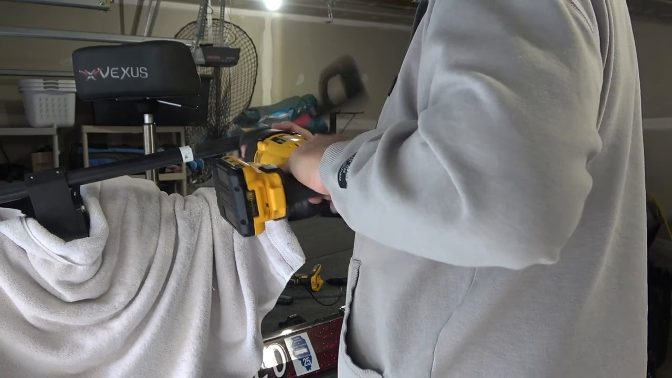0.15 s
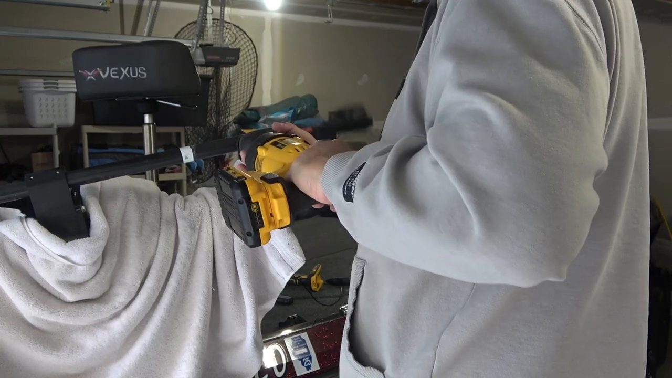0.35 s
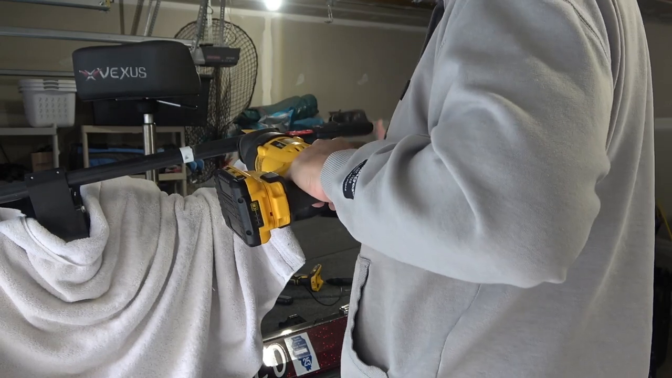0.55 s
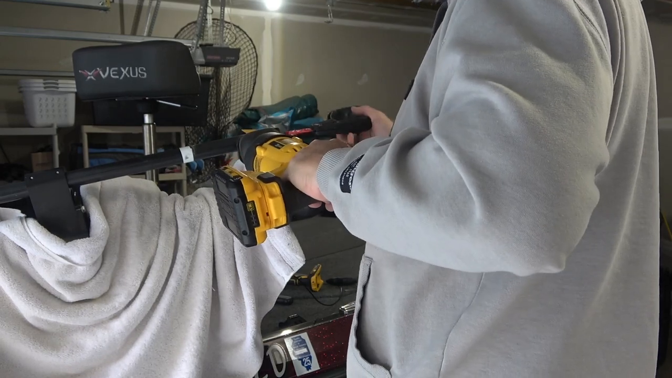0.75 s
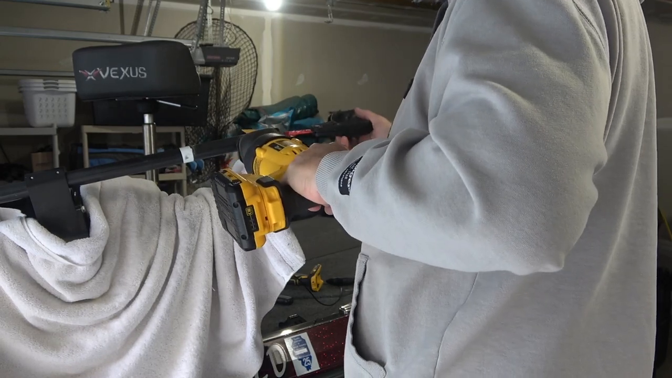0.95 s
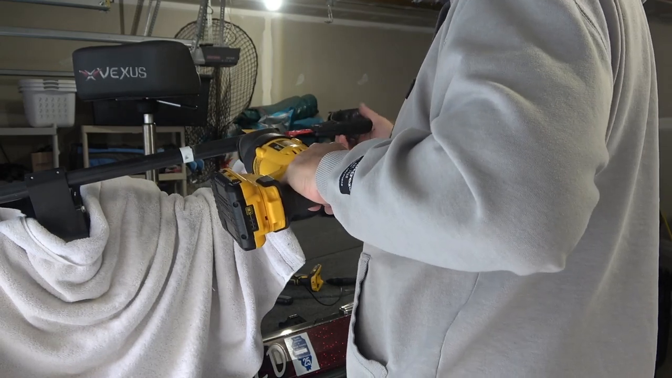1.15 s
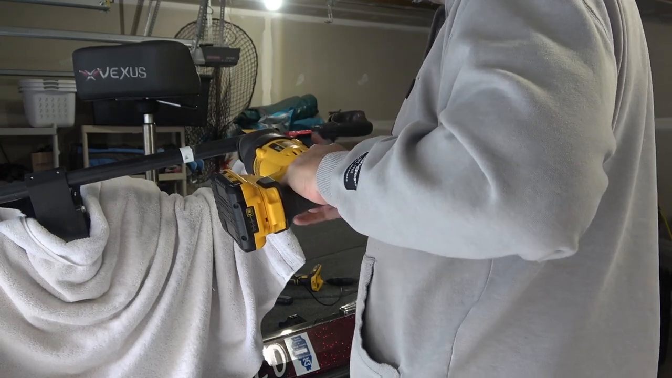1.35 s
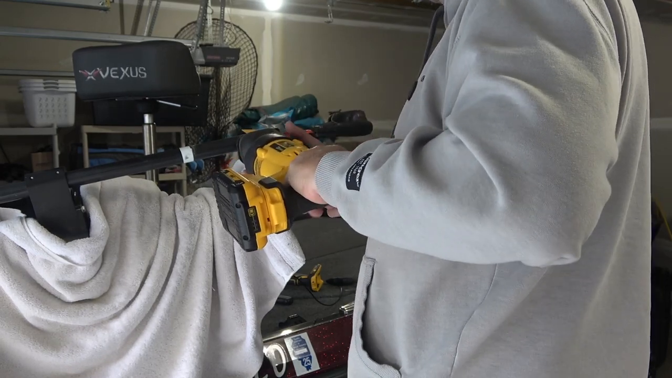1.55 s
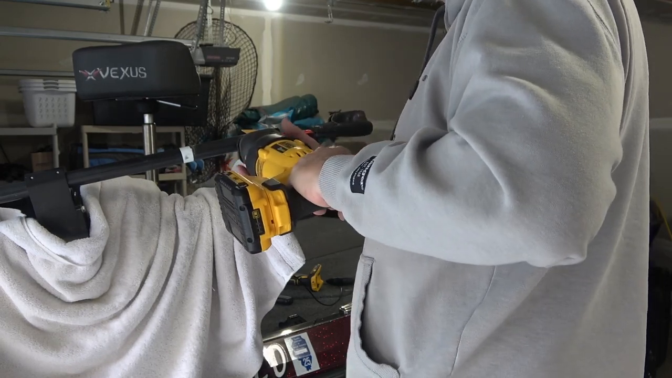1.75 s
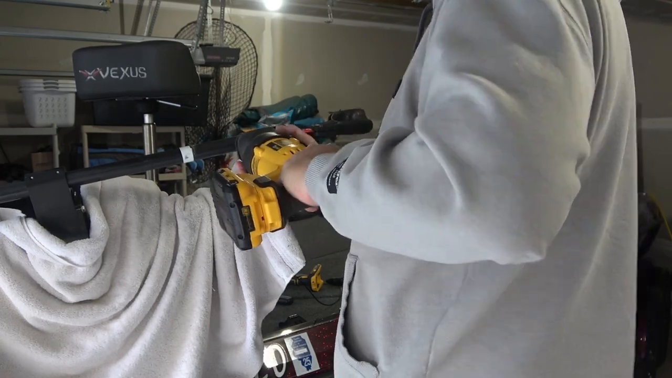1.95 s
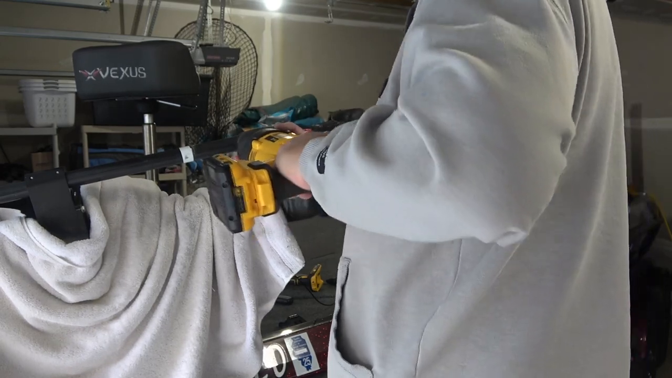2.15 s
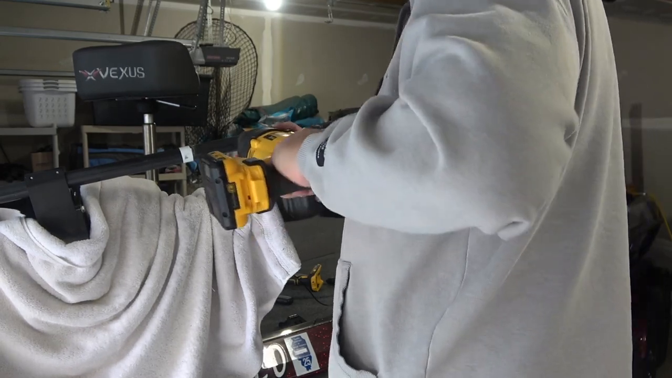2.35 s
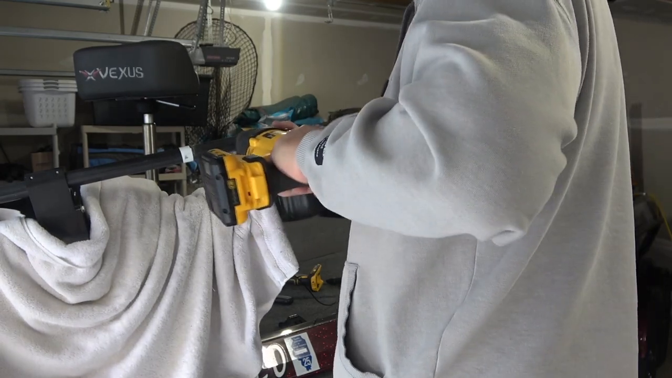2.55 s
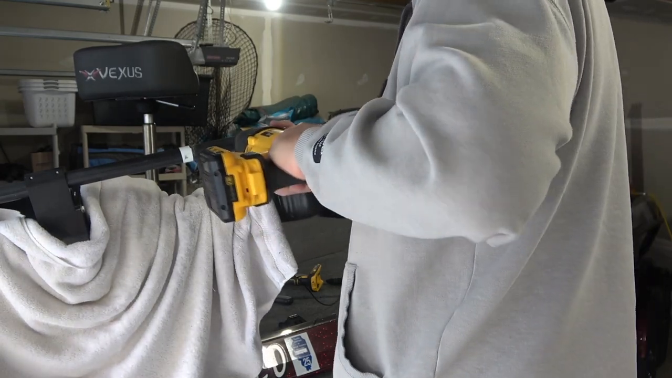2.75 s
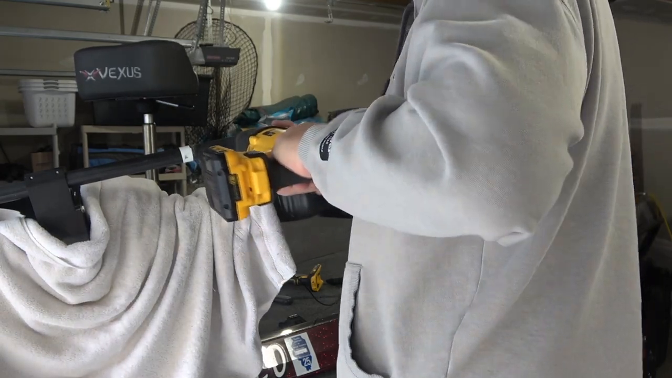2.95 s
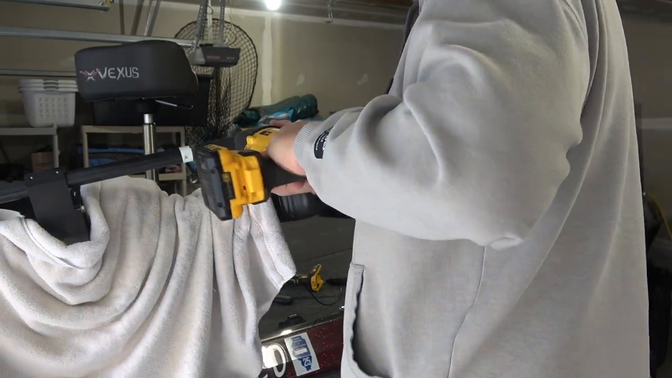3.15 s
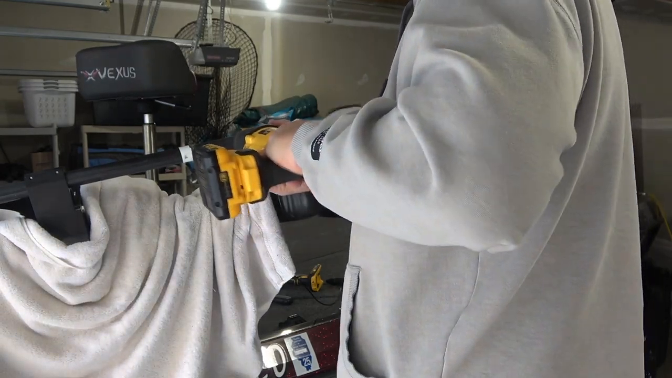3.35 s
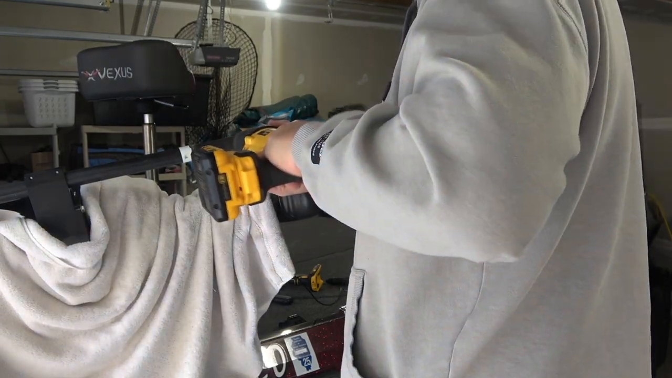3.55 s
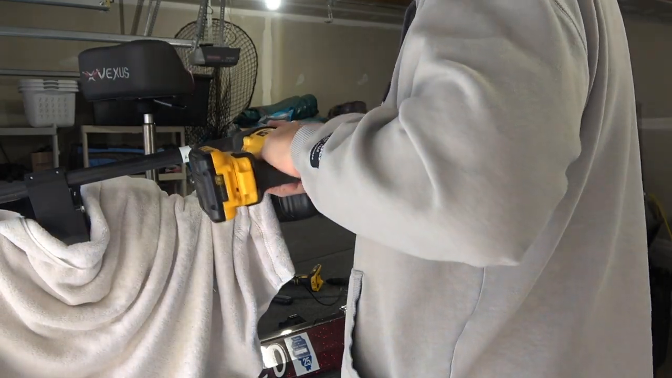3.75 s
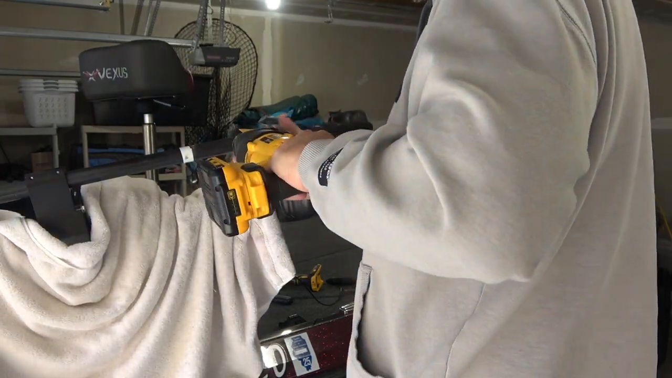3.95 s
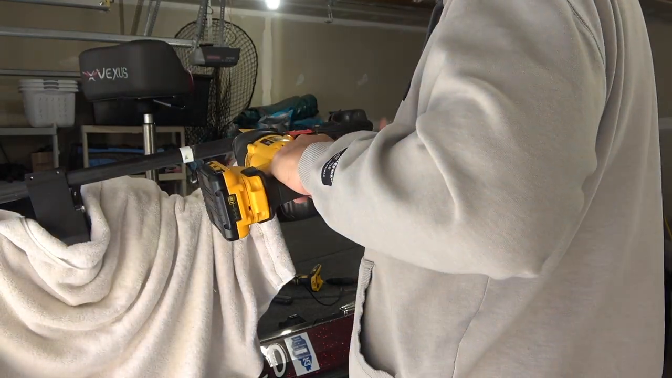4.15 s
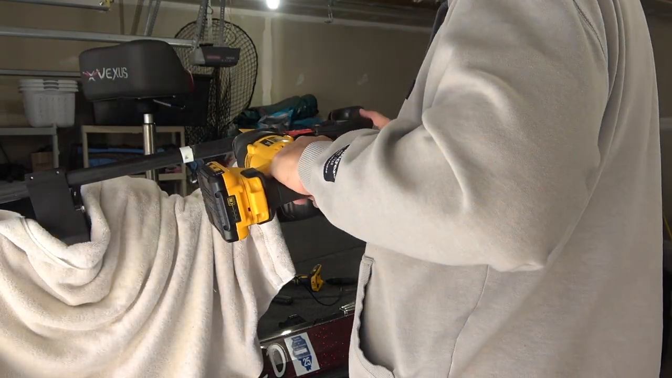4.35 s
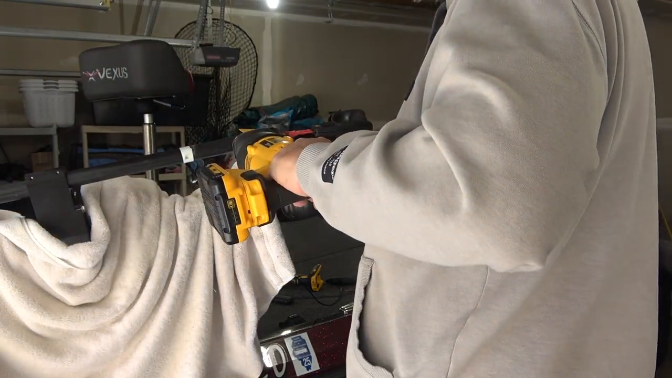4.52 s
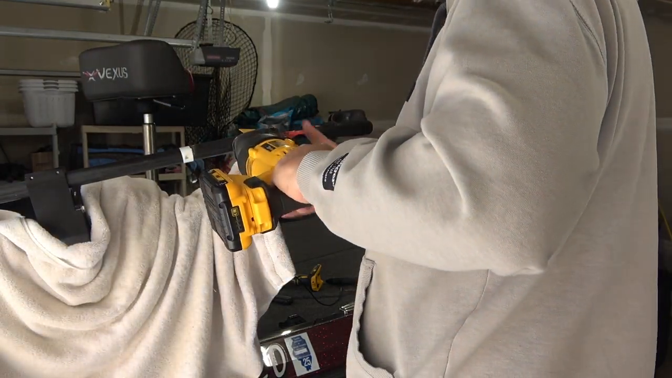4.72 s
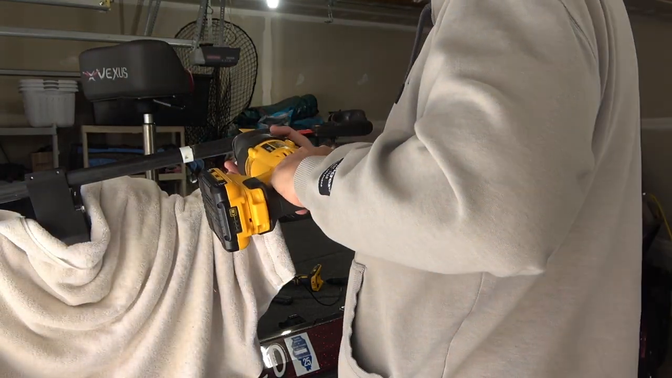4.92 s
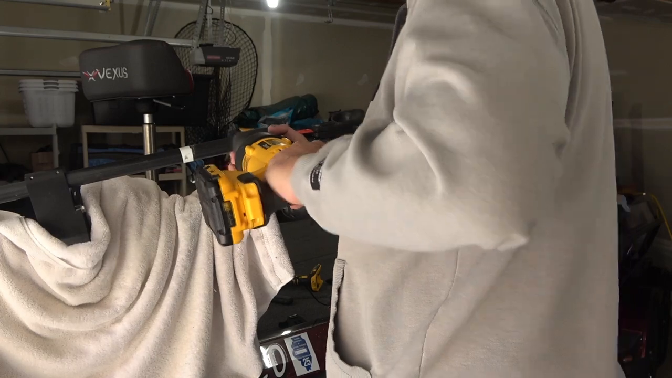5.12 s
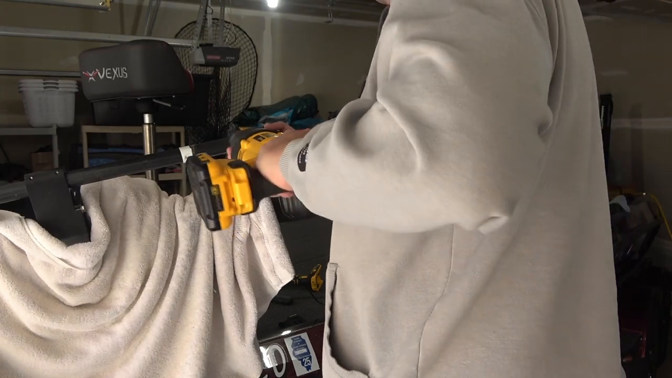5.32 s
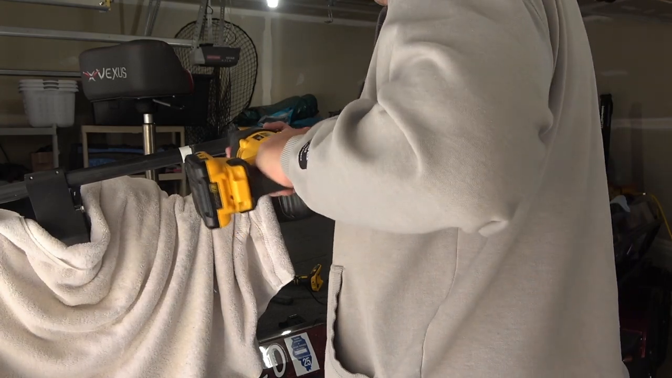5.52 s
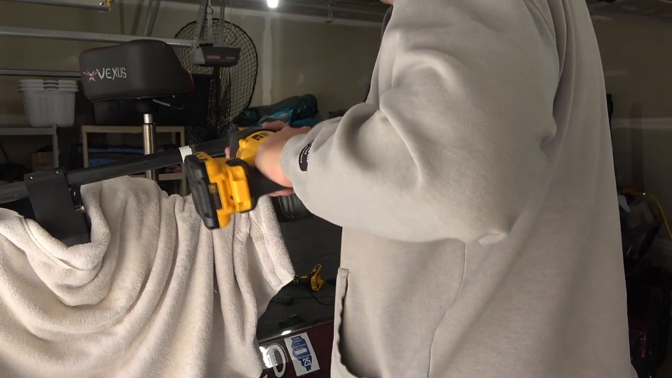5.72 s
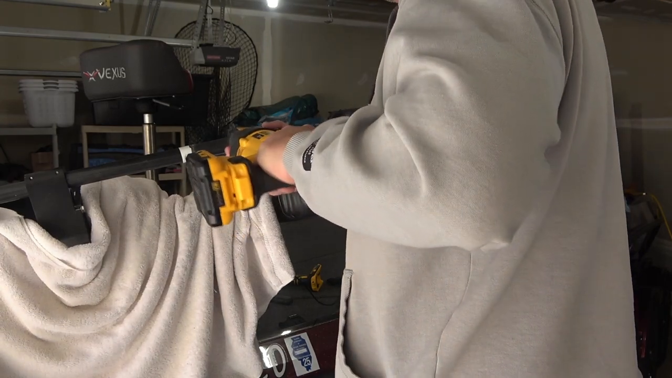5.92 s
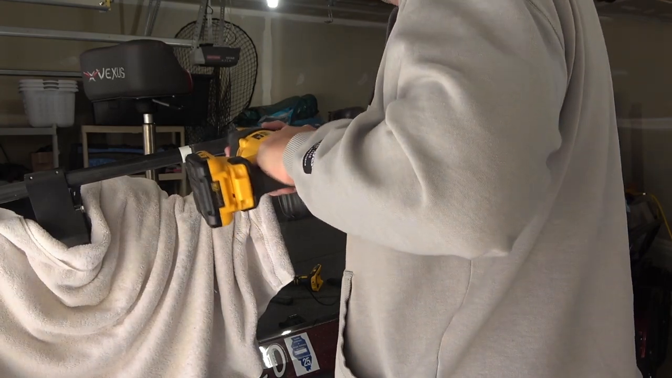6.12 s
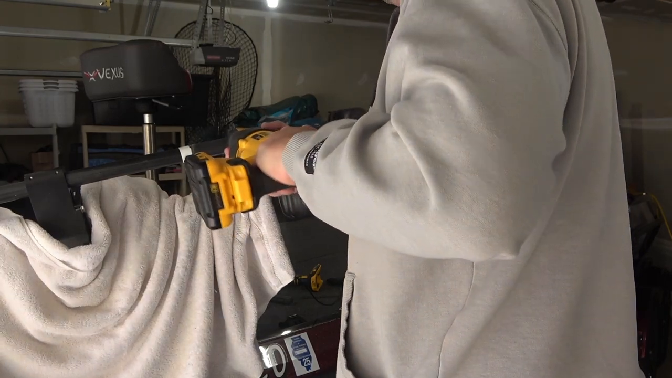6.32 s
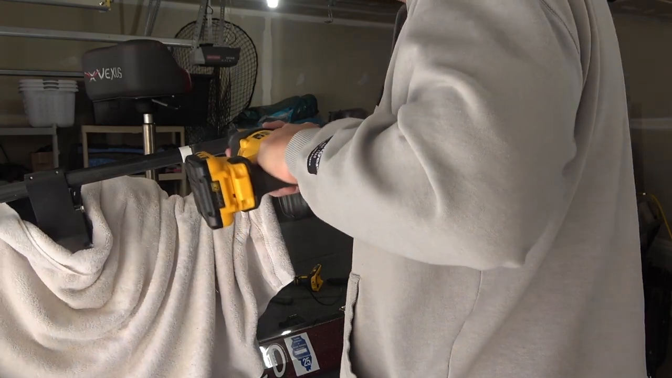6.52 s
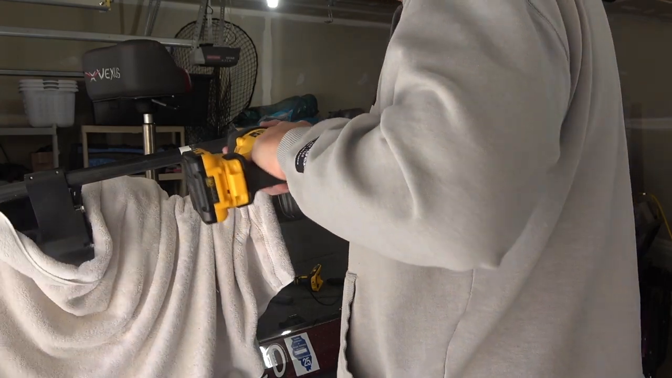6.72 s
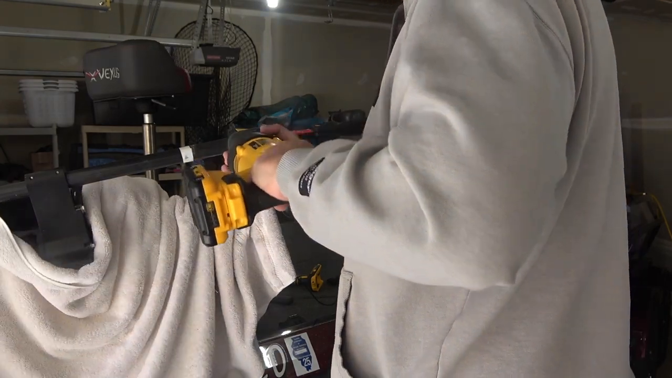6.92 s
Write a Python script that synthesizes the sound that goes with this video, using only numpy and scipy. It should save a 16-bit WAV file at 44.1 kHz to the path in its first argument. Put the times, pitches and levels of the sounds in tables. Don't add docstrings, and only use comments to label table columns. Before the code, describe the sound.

Close stereo microphone in a garage with a short, diffuse echo and faint low hum. At 0 s a saw is already tearing steel, a loud gritty rasp pulsing about 37 times a second, with a clank near 0.1; it brakes dead at 0.24. Small chips tick until about 0.9, cloth rubs near 0.45, and a soft knock, sleeve rustle and light drag on a tube come around 1.3-1.6. At 1.93, after a tiny electronic whine, the saw spins up fast, chattering brightly, then grinding with wavering hum and squeals; from 3.2 loose metal slaps, pings and sizzles until the abrupt stop at 3.85. Ticks follow, with wooden knocks at 4.14 and 4.58 and rustling cloth. At 5.06 the last cut bites, rough and clanging hardest around 5.5-5.8, then singing thinly with scattered slaps until it stops at 6.86, leaving two ticks and a fading echo.

```python
import sys
import numpy as np
from scipy import signal
from scipy.fft import rfft, irfft
from scipy.io import wavfile
from scipy.ndimage import uniform_filter1d

SR = 44100
rng = np.random.default_rng(int(sys.argv[2]) if len(sys.argv) > 2 else 0)


def amplitude_ratio(level_db):
    exponent = np.asarray(level_db, float) / 20
    return 10 ** exponent


def unload_wav(signal):
    wavfile.write(
        sys.argv[1],
        SR,
        np.round(np.clip(np.atleast_2d(signal).T, -1, 1) * 32767).astype(np.int16),
    )


N = 312228
TIME = np.arange(N) / SR


def level(x, db):
    return x * amplitude_ratio(db) / np.sqrt(np.mean(x ** 2))


def noise():
    return rng.standard_normal(N)


def colour(x, spectrum, size=4096):
    hz, db = np.transpose(spectrum)
    log_hz = np.log(np.fft.rfftfreq(size, 1 / SR) + 1)
    log_gain = np.interp(log_hz, np.log(hz), db) * np.log(10) / 20
    cepstrum = irfft(log_gain)
    cepstrum[1:size // 2] *= 2
    cepstrum[size // 2 + 1:] = 0
    return signal.fftconvolve(x, irfft(np.exp(rfft(cepstrum))))[:len(x)]


def band(x, lo_hz, hi_hz, order=2):
    sos = signal.butter(order, [lo_hz, min(hi_hz, SR / 2.1)], "bandpass", fs=SR, output="sos")
    return signal.sosfilt(sos, x)


def peak(x, hz, width):
    return signal.lfilter(*signal.iirpeak(hz, hz / width, fs=SR), x)


def peaks(x, modes):
    return sum(amplitude_ratio(db) * peak(x, hz, width) for hz, width, db in modes)


def ring(x, modes):
    return sum(amplitude_ratio(db) / np.sqrt(width) * peak(x, hz, width) for hz, width, db in modes)


def walk(rate):
    hold = int(SR / rate)
    steps = np.repeat(rng.standard_normal(N // hold + 1), hold)
    return 1.3 * uniform_filter1d(uniform_filter1d(steps, hold), hold)[:N]


def burst(times, db, decay_s, rough=0.69):
    kicks = np.zeros(N)
    kicks[np.clip((np.asarray(times) * SR).astype(int), 0, N - 1)] = amplitude_ratio(np.asarray(db))
    grain = noise()
    decay = signal.lfilter([1], [1, -np.exp(-1 / (decay_s * SR))], kicks)
    return (rough * grain + (1 - rough) * np.sign(grain)) * decay


def swells(rows, rest_db=-120):
    power = sum(amplitude_ratio(db) ** 2 * np.exp(-2 * ((TIME - s) / half) ** 2) for s, half, db in rows)
    return np.sqrt(amplitude_ratio(rest_db) ** 2 + power)


# time in seconds, strokes a second [Hz],
# feed pressure as scrape level in dB.
RUNS = [
    [(0.0, 36.6, -22.5), (0.19, 37.5, -24.5), (0.235, 38.4, -20.5)],
    [(1.926, 40.2, -18), (2.13, 41.0, -19), (2.34, 40.0, -20.5), (2.72, 38.7, -22), (2.842, 38.2, -22.5),
     (2.95, 38.9, -21.5), (3.24, 37.8, -23), (3.68, 37.7, -23), (3.85, 37, -24)],
    [(5.056, 41.1, -19.5), (5.31, 39.7, -21), (5.42, 38.4, -22), (5.63, 37.8, -25.5), (6.03, 37.7, -26.5),
     (6.176, 37.8, -25), (6.3, 37.9, -27.5), (6.66, 37.9, -24), (6.86, 37.9, -25.5)],
]
SPIN_UP_S = [.07, 0.12, 0.06]


def controls():
    s, rate, feed_db = np.vstack(RUNS).T
    press, release = np.array([(run[0][0], run[-1][0]) for run in RUNS]).T
    which = np.searchsorted(press, TIME, "right") - 1
    since = np.where(which > 0, TIME - press[which], np.inf)
    still_slow = np.clip(1 - since / np.take(SPIN_UP_S, which), 0, 1) ** 2.97
    coast = np.clip(1 - (release[which] - TIME) / 0.029, 0, 1)
    scrape_db = np.interp(np.minimum(TIME, release[which]), s, feed_db)
    scrape_db = scrape_db - 42 * still_slow - 12 * coast
    bright_db = -2 * np.exp(-since / 0.095) + 0.76 * walk(9.9)
    return np.interp(TIME, s, rate), scrape_db, bright_db


def running(brake_s=0.005):
    on = sum(1. * ((TIME >= run[0][0]) & (TIME < run[-1][0])) for run in RUNS)
    step = 1 / (brake_s * SR)
    return np.maximum(on, signal.lfilter([step], [1, step - 1], on))


def saw():
    rate, scrape_db, bright_db = controls()
    turn = 2 * np.pi * np.cumsum(rate) / SR
    on = running()
    bite = bites(turn, on)
    drive = colour(bite * noise(), SCRAPE)
    layers = cut(bite, drive, bright_db) + squeal(drive) + swarf(bite) + chatter(bite)
    layers = layers + rumble() + amplitude_ratio(-9.5) * on * crank(turn) + amplitude_ratio(4.5) * on * housing(turn)
    return amplitude_ratio(scrape_db) * layers


def bites(turn, on):
    stroke = 1 + 0.068 * np.cos(turn + 0.77 * walk(2.7))
    hard = np.repeat(rng.exponential(size=N // 16 + 1), 16)[:N]
    return stroke * amplitude_ratio(0.54 * walk(60) + 1.2 * hard) * on * hops()


# frequency in Hz, density in dB per Hz.
SCRAPE = [(20, -54.5), (100, -17), (190, -5.5), (330, -17.5), (480, -11.5), (650, -7), (1000, -7.5),
          (2500, 1), (3500, -6), (4700, -10.5), (6000, -14.5), (7300, -10), (9500, -22.5), (12000, -29.5),
          (13500, -32), (15600, -41.5)]
# frequency in Hz, width in Hz, level in dB over the scrape there.
SHAFT = [(690, 110, -1), (905, 90, 1), (1035, 60, 2), (3470, 140, 5), (3600, 120, 4), (4716, 160, 1),
         (5420, 80, 0), (5800, 90, 8)]
# frequency in Hz, width in Hz, level in dB over the scrape there.
BLADE = [(7720, 60, 2), (8335, 80, 4), (9960, 45, 5), (10375, 70, 7), (10550, 250, 3), (10980, 150, 0),
         (12330, 120, 5), (13435, 35, 9)]
# middle in seconds, half length in seconds, level in dB over the scrape.
SHUDDERS = [
    (.19, 0.034, -12),
    (3.0, 0.097, -14),
    (3.68, 0.17, -17.5),
    (5.44, .05, -18.5),
    (6.45, 0.36, -20),
]
# middle in seconds, half length in seconds, edge boost in dB,
# body cut in dB.
SKATES = [
    (1.974, .05, 0.5, 2.5),
    (2.095, 0.086, 0, 2),
    (2.727, 0.15, 1, 1),
    (5.108, .08, 0.5, 2.5),
    (5.555, 0.12, 0.5, 0),
    (6.6, 0.21, 0, 1),
]
# middle in seconds, half length in seconds, hiss cut in dB.
DULL = [
    (.24, 0.017, 0.5),
    (1.945, .035, 5.5),
    (3.845, 0.021, 2.5),
    (5.07, 0.016, 4.5),
]


def cut(bite, drive, bright_db):
    steel = colour(bite * noise(), SCRAPE)
    for mode in SHAFT + BLADE:
        steel = steel + peaks(drive * amplitude_ratio(1.3 * walk(25)), [mode])
    up_db, down_db = sum(np.outer(db, np.exp(-((TIME - s) / half) ** 2)) for s, half, *db in SKATES)
    dull_db = sum(db * np.exp(-((TIME - s) / half) ** 4) for s, half, db in DULL)
    body = amplitude_ratio(-down_db) * level(band(steel, 130, 2800), 2.64)
    edge = amplitude_ratio(1.5 + bright_db + up_db) * level(band(steel, 2300, 7000), 0.23)
    hiss = amplitude_ratio(-11.5 + bright_db - dull_db) * level(band(steel, 7000, 17000), 2.93)
    shudder = swells(SHUDDERS, -29) * level(band(steel, 20, 130), 1.1)
    return body + edge + hiss + shudder


# frequency in Hz, width in Hz, width of its skirt in Hz.
SQUEAL = (1695, 75, 300)
# middle in seconds, half length in seconds, level in dB over the scrape.
SQUEALS = [(.03, 0.039, -4.5), (.19, 0.025, -4.5), (2.08, 0.033, -8), (2.72, .05, -3.5), (2.92, 0.032, -5),
           (3.24, 0.063, -5.5), (3.5, .3, -9), (5.25, 0.041, -11.5), (6.0, 0.062, -8), (6.33, 0.034, -9.5),
           (6.42, 0.066, -6), (6.62, 0.23, -4)]
# middle in seconds, half length in seconds, level in dB over the scrape.
SING = [
    (5.75, .25, -18),
    (6.1, 0.21, -18.5),
    (6.55, .2, -16),
]


def squeal(drive):
    hz, width, skirt = SQUEAL
    wide = level(peak(peak(drive, hz, width), hz, skirt), -0.64)
    line = level(peak(peak(drive, 1700, 36), hz, width), 0)
    return swells(SQUEALS, -13) * wide + swells(SING) * line


# middle in seconds, half length in seconds, level in dB over the scrape.
SWARF = [
    (.1, 0.15, -28.5),
    (2.05, .08, -27.5),
    (2.95, .15, -28),
    (5.1, 0.071, -26.5),
    (5.4, .18, -24.5),
    (6.05, .15, -22),
    (6.4, 0.22, -28),
    (6.8, 0.074, -25.5),
]


def swarf(bite):
    return swells(SWARF, -31) * level(band(bite * noise(), 11000, 15000, order=3), 0)


# middle in seconds, half length in seconds, level in dB over the scrape.
CHATTERS = [(1.96, 0.047, -6.5), (2.1, .12, -6), (2.45, 0.18, -9), (2.7, 0.14, -11.5), (3.3, 0.34, -14),
            (5.15, .12, -8.5), (5.7, .3, -13.5), (5.59, .025, -6), (5.68, .015, -4), (5.83, .025, -5.5),
            (6.03, .025, -6.5), (6.125, .015, -4), (6.22, .025, -4)]
# frequency in Hz, width in Hz, level in dB.
CHATTER = [(1550, 270, 1), (2100, 400, 1), (3090, 200, -2.5)]


def chatter(bite):
    return swells(CHATTERS) * level(ring(bite * amplitude_ratio(1.7 * walk(150)) * noise(), CHATTER), 0)


def rumble():
    return amplitude_ratio(-32) * running(brake_s=.06) * level(band(noise(), 45, 200), 0)


# multiple of the stroke rate, level in dB.
CRANK = [(2, -32), (3, -20.5), (6, -15), (8, -14.5), (9, -15.5), (12, -16.5), (14, -11), (15, -12),
         (18, -14.5), (24, -5.5), (27, -11)]


def crank(turn):
    out = 0
    for k, db in CRANK:
        phase = 2 * np.pi * rng.random() + 1.5 * walk(9.7)
        out = out + amplitude_ratio(db + 3.5 * walk(9)) * np.sin(k * turn + phase)
    return out


FLARES = {5: [(2.08, 0.031, -16), (2.33, 0.4, -13.5), (3.02, 0.11, -8.5), (3.23, 0.22, -15.5),
          (5.44, 0.054, -15), (5.97, 0.037, -28), (6.2, 0.93, -20.5)], 7: [(2.3, 0.023, -20),
          (2.54, 0.046, -12), (2.74, 0.067, -22), (3.35, 0.77, -16.5), (5.33, 0.024, -13),
          (5.62, 0.2, -17.5), (6.03, 0.075, -13), (6.22, 0.044, -14.5), (6.7, 0.15, -17)],
          10: [(3.78, 0.071, -26), (6.1, 0.19, -19.5), (6.7, 0.17, -21.5)], 16: [(2.5, 0.06, -22),
          (2.74, 0.09, -9), (2.95, .05, -14.5), (3.14, 0.056, -11), (5.3, 0.087, -19)],
          17: [(2.3, 0.093, -14.5), (2.48, 0.13, -14), (2.66, 0.09, -15), (3.0, 0.097, -13.5),
          (3.4, 0.078, -24.5), (5.35, 0.13, -19), (5.62, 0.03, -13.5), (6.0, 0.7, -16.5),
          (6.66, 0.087, -16.5)]}
GEARS = {12: [(2.25, 0.15, -20), (5.2, 0.11, -22.5)], 13: [(5.92, 0.36, -17)], 14: [(2.55, 0.096, -15)],
         18: [(5.6, .06, -13), (6.6, .1, -12), (4.4, .1, -14)], 19: [(3.12, 0.074, -14),
         (3.45, 0.18, -17.5), (3.74, 0.087, -11.5), (5.75, 0.084, -15), (6.1, 0.29, -15), (6.5, 0.2, -15)],
         22.4: [(2.15, .08, -15), (2.95, 0.19, -14), (5.28, 0.087, -13), (5.78, 0.065, -12)],
         23: [(2.2, .1, -15.5), (2.7, 0.15, -12.5), (3.2, .1, -16.5)], 24: [(2.1, .1, -23),
         (3.63, 0.052, -15.5), (5.4, 0.093, -15), (6.7, 0.12, -13.5)], 25: [(3.38, 0.085, -10),
         (6.35, 0.063, -9)], 26: [(2.5, .1, -17), (3.5, .1, -10.5), (5.35, .06, -14)],
         27.3: [(3.17, .05, -8.5), (3.3, .04, -13), (3.65, 0.074, -9), (5.5, 0.052, -13), (5.75, .08, -9.5),
         (6.32, 0.091, -6), (6.55, 0.16, -14.5)]}


def housing(turn):
    flare = {k: swells(rows, -27) for k, rows in FLARES.items()}
    out = flare[5] * (np.sin(5 * turn + .15 * walk(6)) + .5 * np.sin(4 * turn))
    out = out + flare[7] * np.sin(7 * turn + .2 * walk(6))
    for k in (10, 16, 17):
        out = out + flare[k] * np.sin(k * turn + .2 * walk(8))
    for k, rows in GEARS.items():
        out = out + swells(rows) * np.sin(k * turn + .4 * walk(7))
    return out


# time in seconds, clamp ping peak in dB, clank in dB.
SLAPS = [(0.022, -26, -29), (0.0867, -16.5, -15.5), (0.1808, -29.5, -18.5), (1.941, -68, -35),
         (1.9802, -37, -21), (2.918, -34.5, -23.5), (3.2196, -15, -21.5), (3.313, -16, -15.5),
         (3.337, -16.5, -21.5), (3.393, -14.5, -16), (3.487, -8.5, -16), (3.514, -25, -29),
         (3.5553, -11, -17), (3.5988, -14, -18), (3.625, -24.5, -30), (3.682, -20, -28),
         (3.742, -22, -31.5), (3.776, -29.5, -27.5), (3.79, -27, -30), (3.801, -26, -28.5),
         (5.0845, -37.5, -33.5), (5.939, -30.5, -22.5), (6.4121, -34.5, -25), (3.6578, -14.5, -22.5),
         (3.715, -11.5, -17.5), (3.8158, -24, -27), (5.066, -48, -31.5), (5.095, -30, -28),
         (5.2664, -28.5, -22.5), (5.5302, -18.5, -12), (5.614, -27.5, -10.5), (5.659, -25.5, -19.5),
         (5.708, -25, -12), (5.7991, -32, -12), (5.9169, -30.5, -16), (5.9906, -32.5, -15.5),
         (6.1058, -30, -17), (6.1556, -28.5, -18.5), (6.1857, -23, -18), (6.5707, -31, -24),
         (6.705, -15, -19.5), (6.7851, -27, -15)]
# frequency in Hz, width in Hz, level in dB.
PING = [(10550, 700, 0), (11200, 900, -3), (9700, 900, -7)]
# middle in seconds, half length in seconds, level in dB.
RATTLES = [
    (3.16, .04, -38),
    (3.26, .04, -37.5),
    (3.34, 0.026, -32),
    (3.42, 0.027, -37),
    (3.6, 0.054, -45.5),
    (3.73, .03, -36),
    (3.78, 0.026, -35.5),
    (6.72, 0.054, -46.5),
]


def slaps():
    s, ping_db, clank_db = np.transpose(SLAPS)
    ping = ring(burst(s, ping_db + 36.5, 0.00093) + burst(s, ping_db + 4.5, 0.014), PING)
    sizzle = band(ring(noise() * amplitude_ratio(4.1 * walk(220)), PING), 10150, 11250)
    ping = band(ping, 9000, 12500) + swells(RATTLES) * level(sizzle, -1)
    crack = band(burst(s, clank_db - 13.5, 0.0086) + burst(s, clank_db - 24.5, 0.025), 6000, 14300)
    blow = band(burst(s, clank_db + 2, 0.0051) + burst(s, clank_db - 10.5, 0.025), 560, 5330, order=4)
    clank = peaks(blow, SHAFT) + amplitude_ratio(10) * peak(blow, *SQUEAL[:2])
    return ping + crack + amplitude_ratio(1.5) * peaks(crack, BLADE) + amplitude_ratio(-0.5) * blow + amplitude_ratio(1) * clank


def hops():
    hop_s, dip_db = 0.0055, 0
    for s, _, clank_db in SLAPS:
        depth_db = -2.5 * np.clip((clank_db + 25) / 8, 0, 1)
        dip_db = dip_db + depth_db * np.exp(-((TIME - s + hop_s) / hop_s) ** 2)
    return amplitude_ratio(dip_db)


# time in seconds, peak in dB.
CLANGS = [(0.0871, -21), (2.088, -19.5), (2.18, -21.5), (5.5305, -11), (5.572, -22.5), (5.592, -19.5),
          (5.659, -18.5), (5.682, -22.5), (5.7055, -11.5), (5.80, -21.5), (5.915, -22.5), (5.938, -21.5),
          (6.108, -22.5), (6.155, -22.5), (6.198, -19.5), (6.411, -28.5)]
# frequency in Hz, width in Hz, level in dB.
CLANG = [(3470, 170, 1.5), (3590, 140, -0.5), (3120, 400, -18)]


def clangs():
    s, db = np.transpose(CLANGS)
    return ring(burst(s, db + 37.5, 0.0035) + burst(s, db + 29.5, 0.016), CLANG)


# middle in seconds, half length in seconds, level in dB.
ROCKS = [
    (.2, 0.061, -38),
    (.3, 0.032, -57),
    (3.8, 0.085, -43),
    (3.92, 0.055, -58),
    (6.8, 0.11, -48),
    (6.92, .06, -62),
]


def rocks():
    return swells(ROCKS) * level(band(noise(), 50, 300), 0)


# frequency in Hz, width in Hz, then the level in dB in each of the three runs.
STAND = [(374, 3, -63.5, -57.5, -46.5), (1790, 4, -59.5, -62, -53)]


def stand(tool):
    run = np.searchsorted([r[0][0] for r in RUNS], TIME, "right") - 1
    return sum(ring(tool * amplitude_ratio(np.take(db, run)), [(hz, width, 49)]) for hz, width, *db in STAND)


# frequency in Hz, level in dB.
WHINE = [(3914, -61), (4199, -72), (5340, -80), (7817, -72), (11693, -71), (15601, -80)]
WHINE_S = (1.912, 1.932, 1.955)


def whine():
    swell = np.interp(TIME, WHINE_S, [0, 1, 0]) ** 2
    return swell * sum(amplitude_ratio(db + 7) * np.sin(2 * np.pi * hz * TIME) for hz, db in WHINE)


# time in seconds, peak in dB, sparkle in dB over it.
TICKS = [(0.2894, -39, -18.5), (0.394, -40.5, -24), (0.441, -64, -12), (0.455, -62, -12),
         (0.535, -59.5, -14), (0.5985, -58, -12), (0.7127, -59, -20.5), (0.7195, -58.5, -12.5),
         (0.8583, -66, -24), (1.5527, -46.5, -25.5), (1.6931, -78, -22), (1.83, -65, -9),
         (1.911, -54.5, -21), (3.9238, -50.5, -25.5), (3.9603, -52.5, -8), (4.0496, -57.5, -21.5),
         (4.585, -52, -13), (4.814, -73, -24), (6.9358, -48.5, -12), (6.9715, -48.5, -28)]
# frequency in Hz, width in Hz, level in dB.
CHIP = [(1190, 900, -9.5), (2980, 500, 4), (3650, 500, 7.5), (4680, 790, -2.5), (5810, 830, -8.5)]


def ticks():
    s, db, sparkle_db = np.transpose(TICKS)
    chip = ring(burst(s, db + 25, 0.0023), CHIP)
    sparkle = band(burst(s, db + sparkle_db - 0.5, .0015), 6500, 15000)
    return chip + sparkle + band(burst(s, db - 1, 0.006), 500, 2400)


# time in seconds, peak in dB, thud in dB over it.
KNOCKS = [
    (1.335, -71, 1),
    (1.358, -84, 9),
    (1.911, -64, -22),
    (4.141, -56, -14),
    (4.157, -70.5, -11.5),
    (4.177, -69, -10),
    (4.577, -51, -4),
]
# frequency in Hz, width in Hz, level in dB.
BENCH = [(400, 230, 1), (623, 120, -8.5), (806, 140, 12.5), (991, 160, -11), (1750, 300, -10)]


def knocks():
    s, db, thud_db = np.transpose(KNOCKS)
    top = band(ring(burst(s, db + 40.5, 0.0068), BENCH), 220, 1100)
    thud = ring(burst(s + 0.0039, db + thud_db + 53.5, 0.0089), [(159.0, 41, 0)])
    scuff = band(burst(s + 0.0065, db - 7, .025), 600, 1300) + band(burst(s, db - 10.5, .012), 1500, 4500)
    return top + band(thud, 112, 260, order=3) + scuff


# middle in seconds, half length in seconds, rub in dB, crisp in dB.
SLEEVE = [(0.449, 0.077, -63, -68), (.98, .12, -86, -79), (1.348, 0.044, -71, -76), (1.44, 0.042, -58, -74),
          (1.526, 0.095, -59, -80), (1.807, 0.22, -69, -73.5), (4.288, 0.075, -75, -91),
          (4.563, 0.038, -64, -82), (4.615, .035, -65.5, -74), (4.72, 0.088, -70, -90),
          (4.813, .022, -68.5, -72.5), (4.888, 0.046, -70, -82), (5.05, 0.024, -59.5, -62)]
# frequency in Hz, density in dB per Hz.
RUSTLE = [(200, -24), (450, -10), (600, -16), (815, -5), (980, -10), (1160, 0), (1350, -11), (1900, -14),
          (3000, -28), (8000, -50)]


def sleeve():
    rub = level(colour(noise() * amplitude_ratio(3 * walk(47)), RUSTLE), -3)
    crisp = level(band(noise() * amplitude_ratio(3.3 * walk(140)), 1700, 4300, order=3), -2.5)
    rows = np.array(SLEEVE)
    return swells(rows[:, :3]) * rub + swells(rows[:, [0, 1, 3]]) * crisp


# middle in seconds, half length in seconds, level in dB.
DRAGS = [
    (1.44, .03, -69),
    (1.5, .04, -74),
    (1.56, 0.055, -64.5),
    (1.61, 0.033, -70),
]
# frequency in Hz, width in Hz, level in dB.
TUBE = [(450.7, 45, -2.5), (830, 60, -0.5), (1140, 60, 0), (1550, 90, -8.5), (1945, 60, -10.5)]


def drags():
    return swells(DRAGS) * level(ring(ring(noise(), TUBE), TUBE), 0)


# frequency in Hz, time to fall 60 dB in seconds.
GARAGE = [(150, .32), (500, .27), (1400, .26), (3300, .25), (6500, .18), (12500, .1)]


def garage(x, size=SR // 2, count=6):
    t, out = np.arange(size) / SR, 0
    for k in range(count):
        echo = 0
        for hz, t60 in GARAGE:
            diffuse = band(rng.standard_normal(size), hz / 1.78, hz * 1.855, order=4)
            echo = echo + diffuse * np.exp(-np.log(1000) * t / t60)
        echo = echo * np.clip(t / 0.032, 0, 1)
        turn = np.clip(1 - np.abs((TIME / .09 - k) % count - 1), 0, 1)
        sent = x * np.sin(np.pi / 2 * turn)
        out = out + signal.fftconvolve(sent, echo / np.sqrt(np.sum(echo ** 2)))[:N]
    return amplitude_ratio(-16) * out


# frequency in Hz, density in dB per Hz.
HUM = [(15, -44), (25, -21.5), (55, -17), (86, -19), (119, -8), (140, -4), (156, -16), (274, -16),
       (640, -17), (800, -12), (920, -8), (1050, -9), (1350, -22.5), (1900, -27.5), (3400, -31.5),
       (4760, -35.5), (15600, -52.5)]


def hum():
    mid, side = (level(colour(noise(), HUM), -69) * amplitude_ratio(walk(0.65)) for _ in range(2))
    patchy = amplitude_ratio(-5 + np.minimum(18 * walk(20), 0))
    return mid + patchy * band(side, 350, 15000) * np.array([[1], [-1]])


def scene():
    tool = saw() + slaps() + clangs() + rocks()
    near = tool + stand(tool) + whine() + ticks() + knocks() + sleeve() + drags()
    return near + garage(near) + hum()


def top_cut(x):
    return signal.sosfilt(signal.butter(12, 15720, fs=SR, output="sos"), x)


# start in seconds, length in seconds,
# start frequency in Hz, width in Hz.
SLIPS = [(2.06, .95, 3950, 290), (2.08, .2, 3300, 170), (2.15, .17, 2950, 170), (2.2, .45, 2400, 170),
         (2.41, .15, 2630, 170), (2.15, .15, 2570, 130), (2.2, .28, 9700, 350), (2.1, .38, 10900, 300),
         (2.0, .42, 7250, 130), (2.55, .45, 14800, 900), (2.83, .17, 8950, 600), (2.83, .19, 6250, 170),
         (5.35, .12, 8200, 500), (6.03, .08, 10400, 260), (6.8, .09, 5500, 260), (.1, .012, 1030, 90),
         (1.98, .012, 9500, 10000), (2.69, .07, 1880, 50), (3.1, .12, 3950, 50), (3.43, .012, 760, 90),
         (5.075, .012, 500, 50), (5.065, .012, 1800, 130), (5.065, .012, 2750, 200), (5.43, .05, 2950, 50),
         (5.6, .012, 930, 170), (6.34, .04, 5150, 50), (6.57, .04, 4050, 50)]


def record(dry):
    hz, s, z = signal.stft(dry, SR, nperseg=1024)
    slip = np.zeros(z.shape[1:])
    for start, length, start_hz, width in SLIPS:
        end_hz = start_hz - 1150 * length
        centre = np.interp(s, [start, start + length], [start_hz, end_hz], left=-1e5, right=-1e5)
        slip[np.abs(hz[:, None] - centre) < width / 2] = .75
    opposite = np.array([1, -1])[:, None, None]
    wet = signal.istft(z * np.exp(1j * slip * opposite), SR, nperseg=1024)[1][:, :N]
    wet = 1.56 * np.tanh(wet / 1.64)
    wet = signal.sosfilt(signal.ellip(8, .2, 60, 15700, fs=SR, output="sos"), wet)
    return top_cut(wet)


dry = scene()
out = record(dry)
unload_wav(out)
```